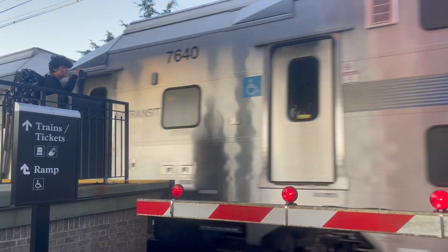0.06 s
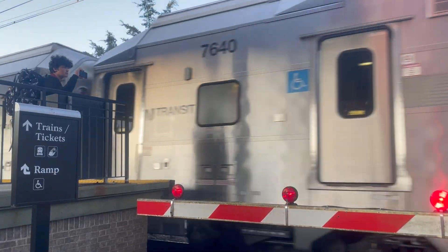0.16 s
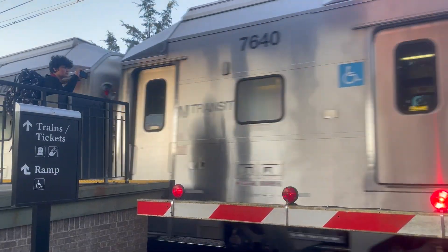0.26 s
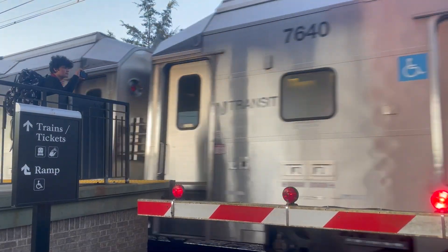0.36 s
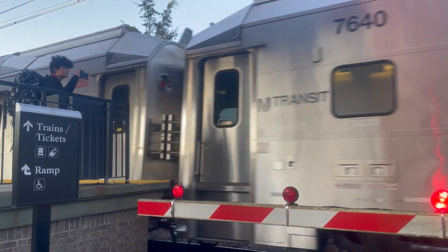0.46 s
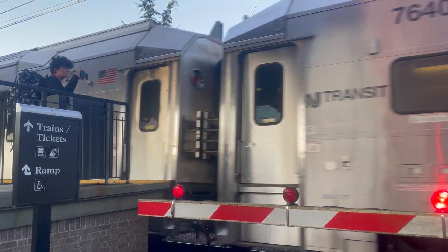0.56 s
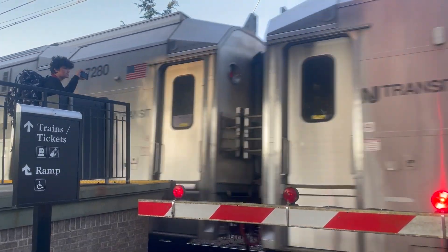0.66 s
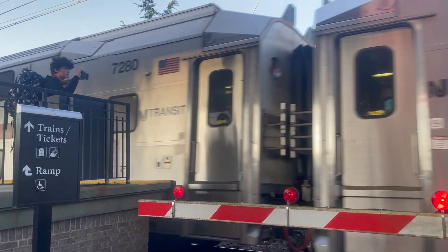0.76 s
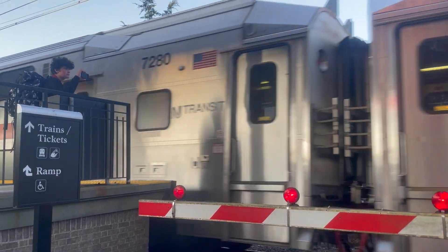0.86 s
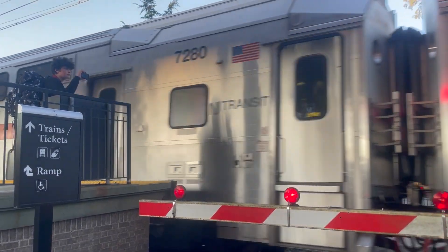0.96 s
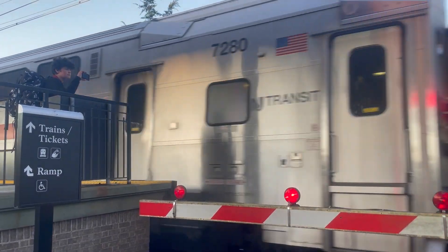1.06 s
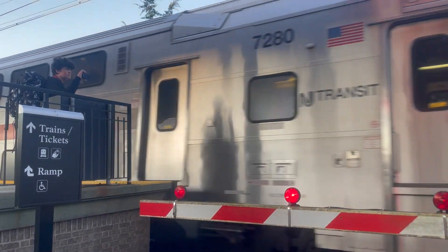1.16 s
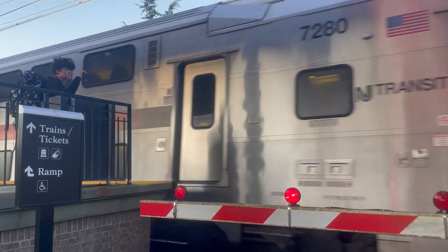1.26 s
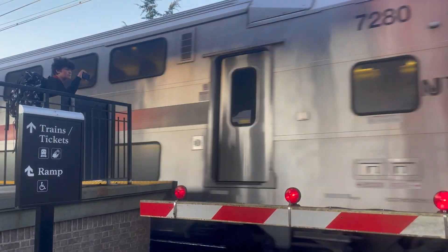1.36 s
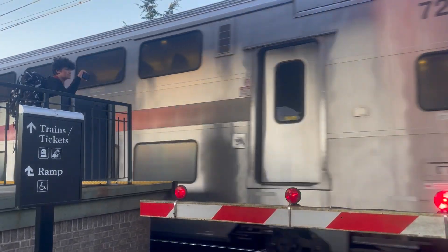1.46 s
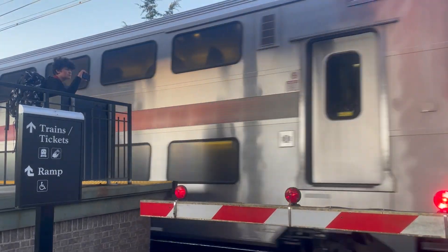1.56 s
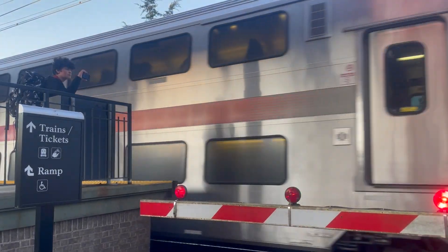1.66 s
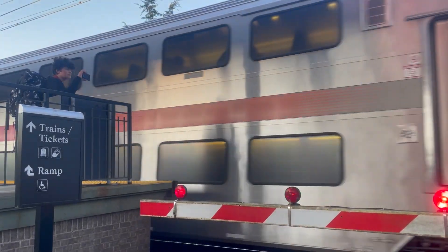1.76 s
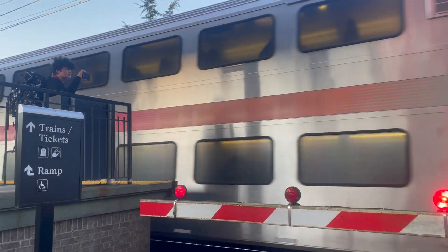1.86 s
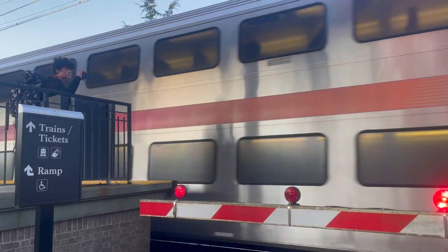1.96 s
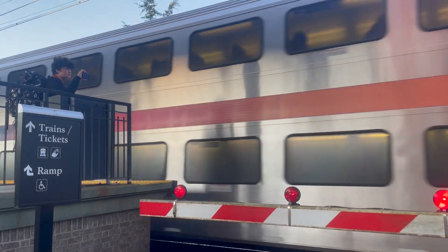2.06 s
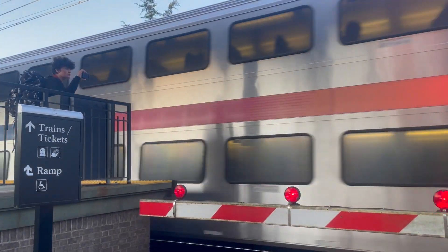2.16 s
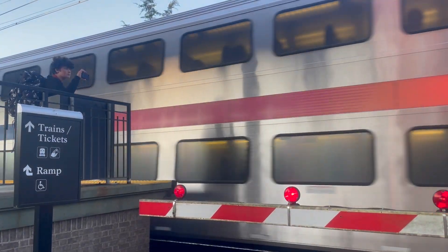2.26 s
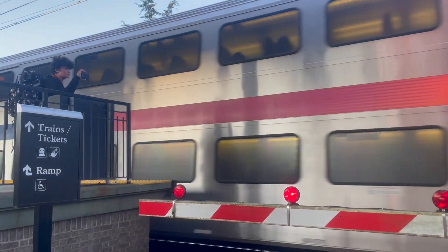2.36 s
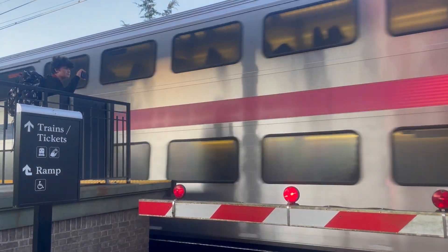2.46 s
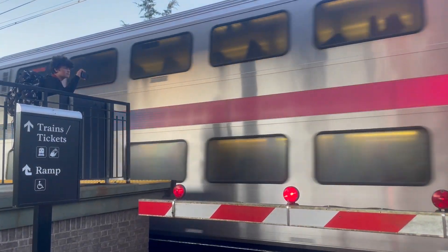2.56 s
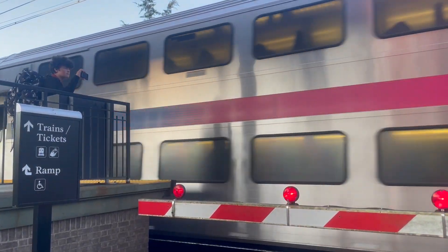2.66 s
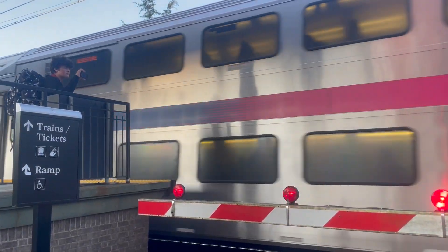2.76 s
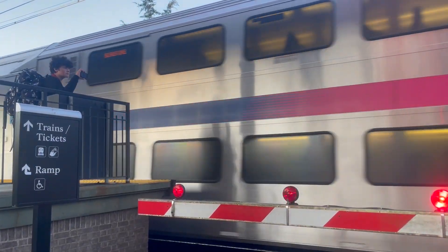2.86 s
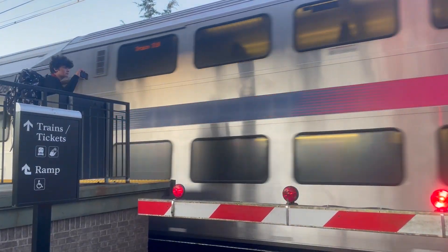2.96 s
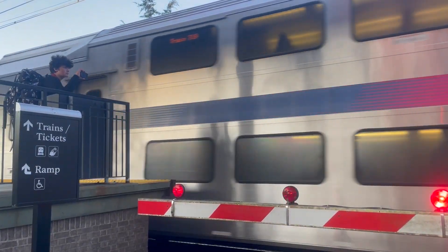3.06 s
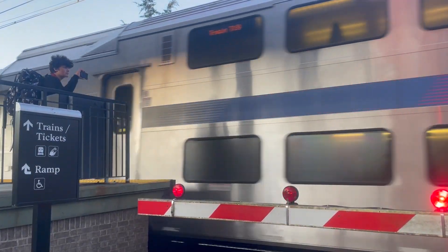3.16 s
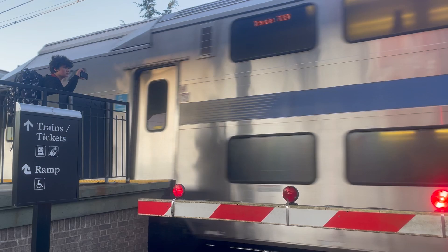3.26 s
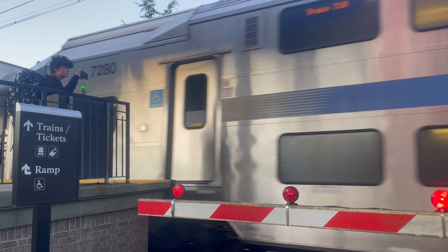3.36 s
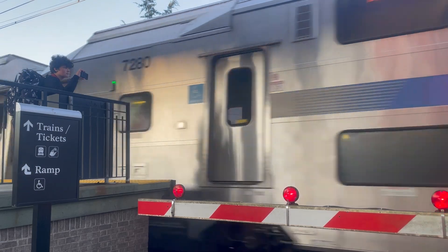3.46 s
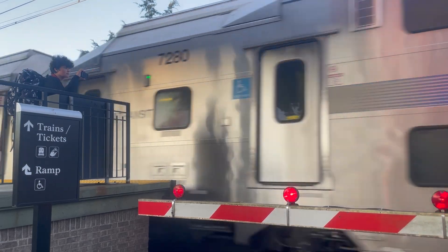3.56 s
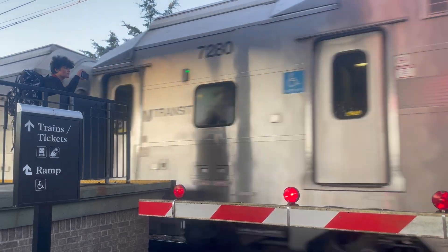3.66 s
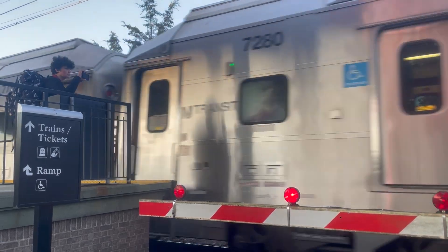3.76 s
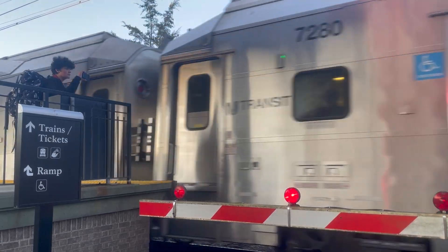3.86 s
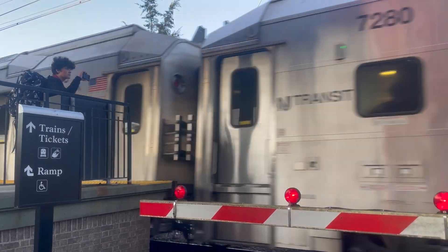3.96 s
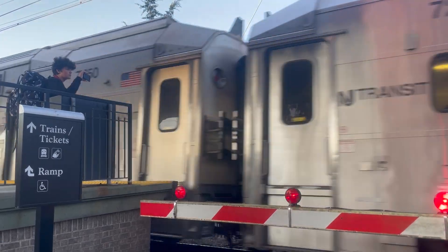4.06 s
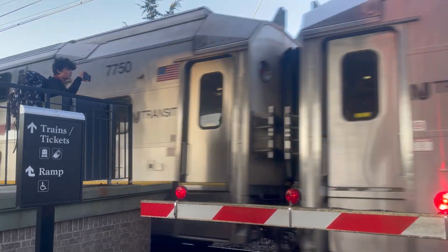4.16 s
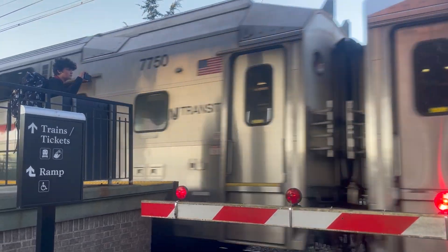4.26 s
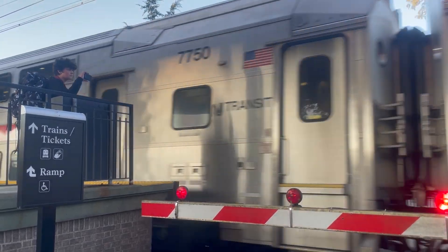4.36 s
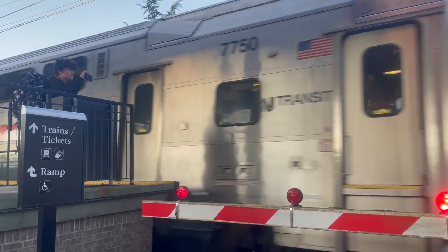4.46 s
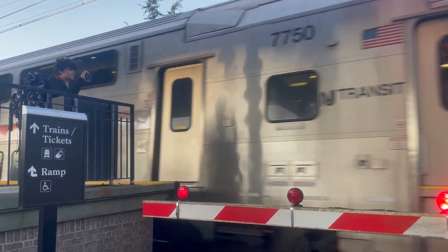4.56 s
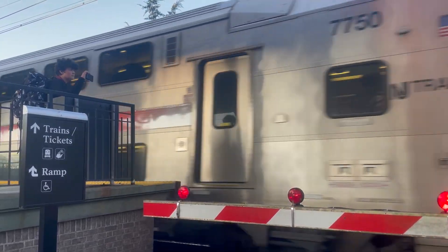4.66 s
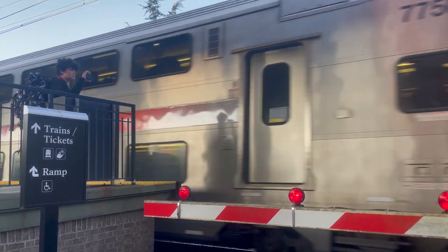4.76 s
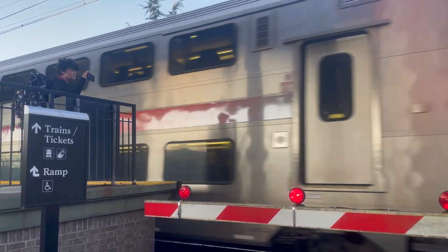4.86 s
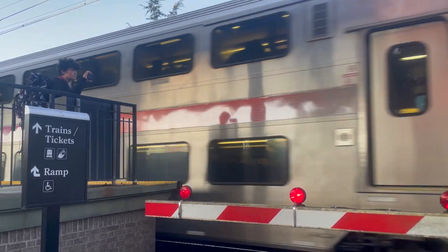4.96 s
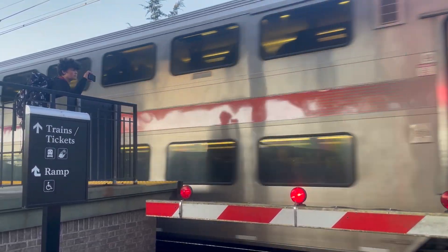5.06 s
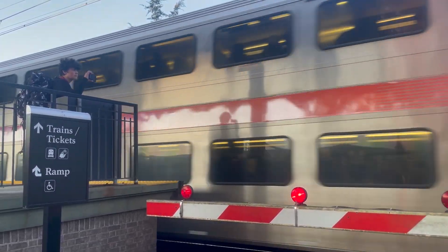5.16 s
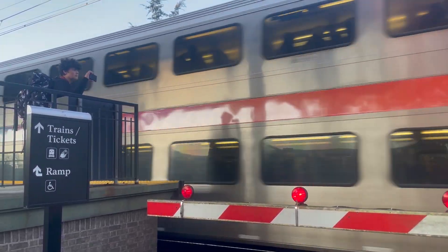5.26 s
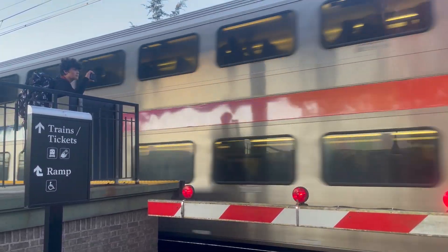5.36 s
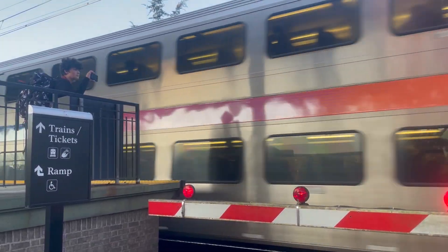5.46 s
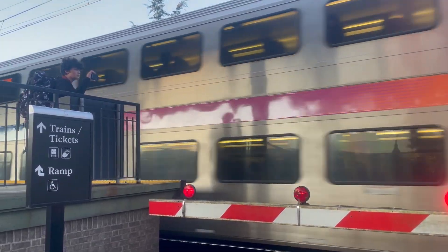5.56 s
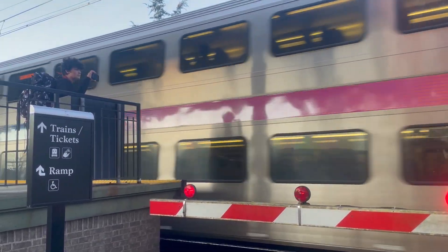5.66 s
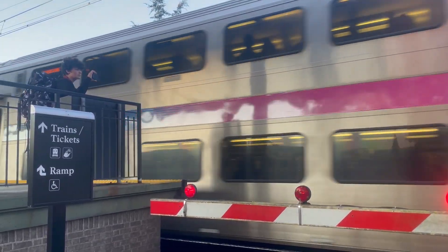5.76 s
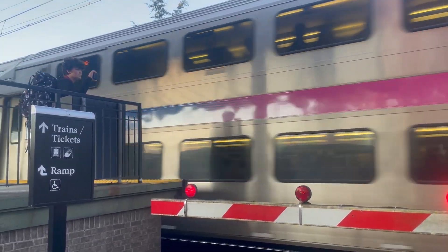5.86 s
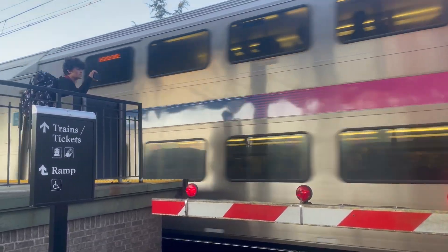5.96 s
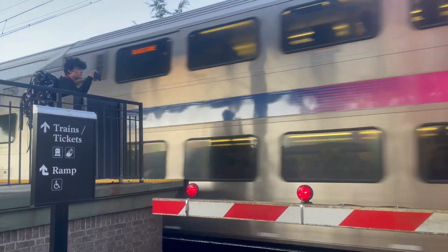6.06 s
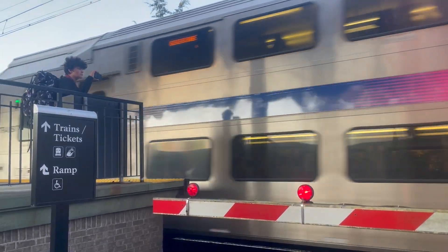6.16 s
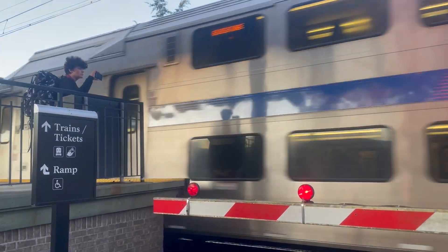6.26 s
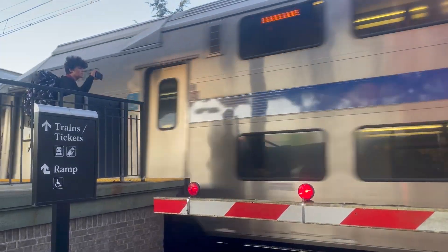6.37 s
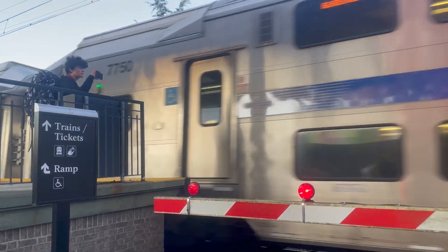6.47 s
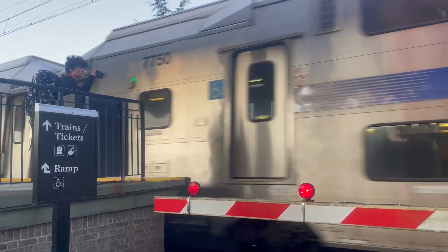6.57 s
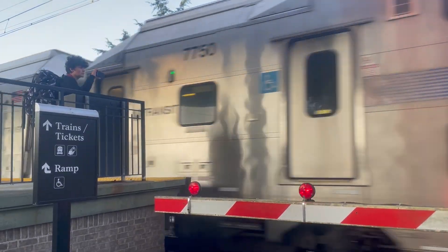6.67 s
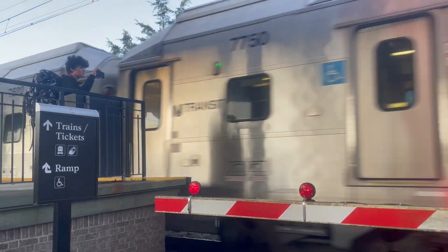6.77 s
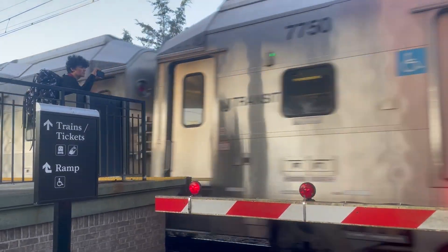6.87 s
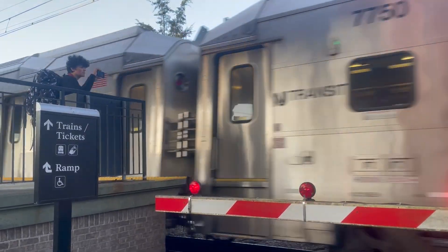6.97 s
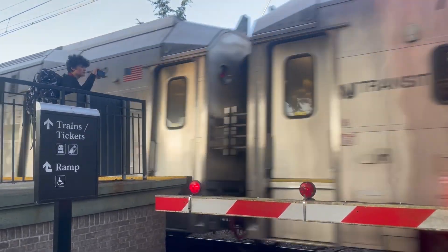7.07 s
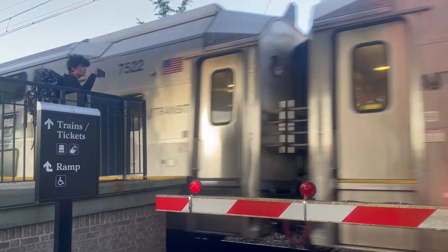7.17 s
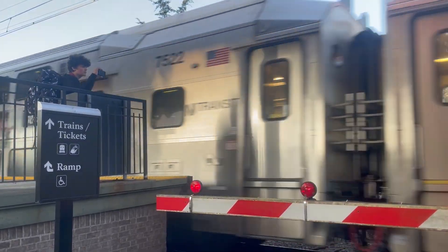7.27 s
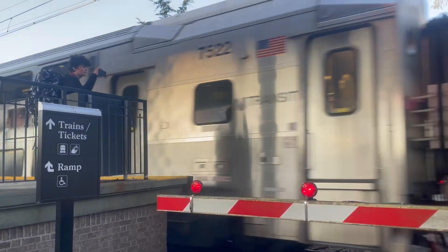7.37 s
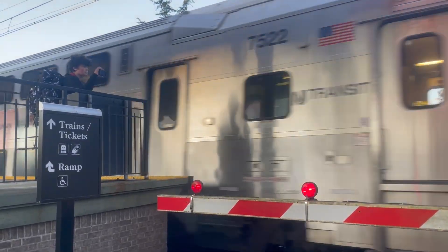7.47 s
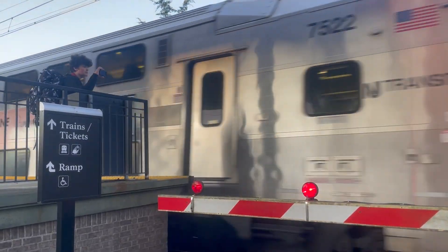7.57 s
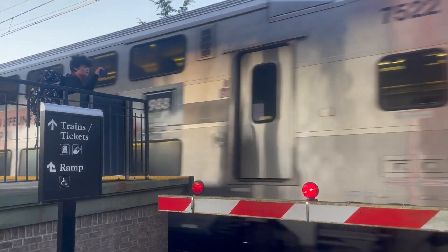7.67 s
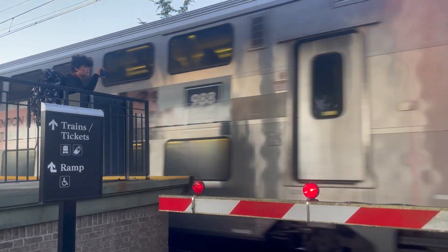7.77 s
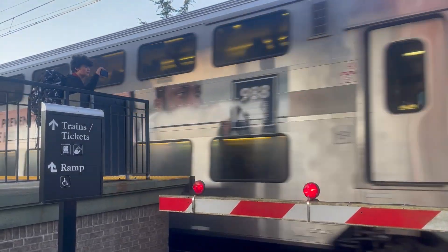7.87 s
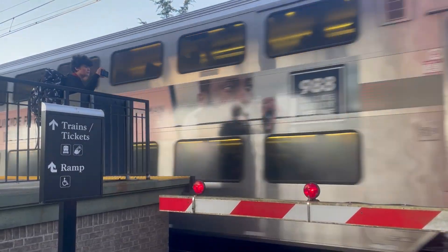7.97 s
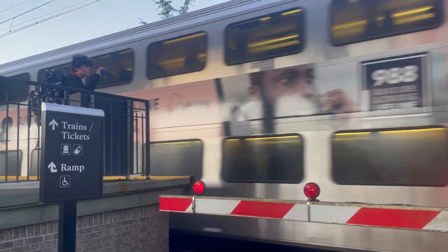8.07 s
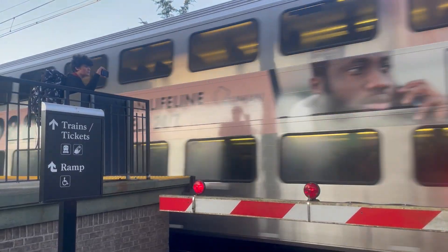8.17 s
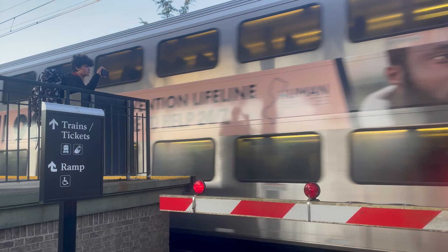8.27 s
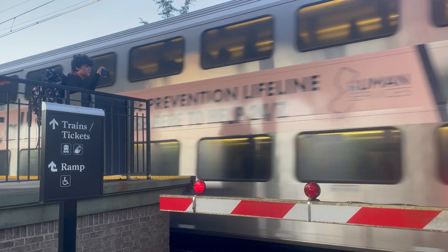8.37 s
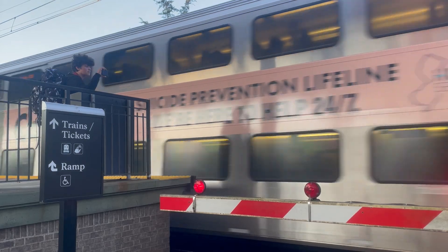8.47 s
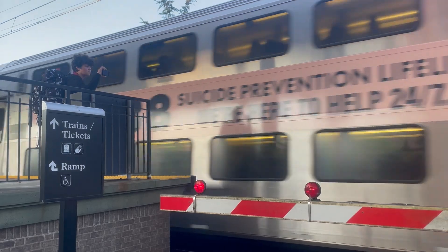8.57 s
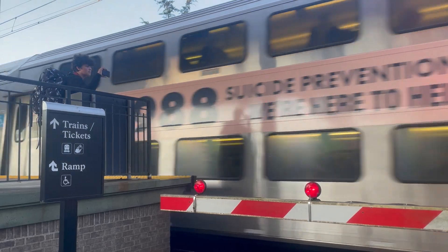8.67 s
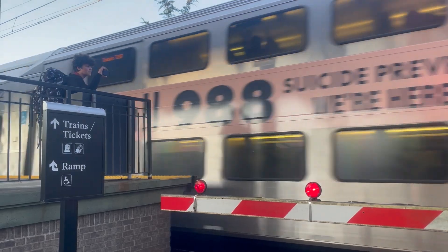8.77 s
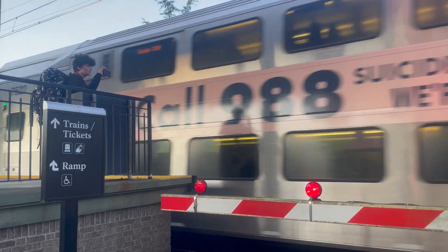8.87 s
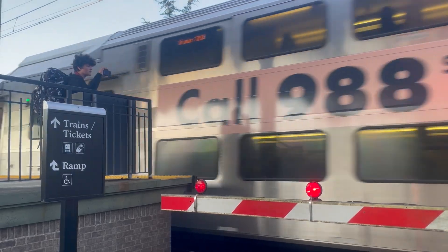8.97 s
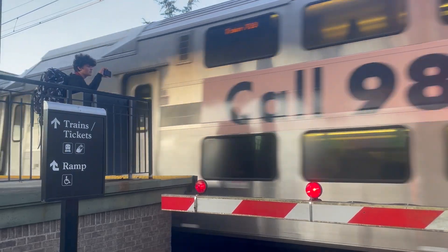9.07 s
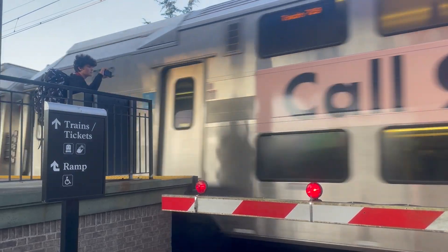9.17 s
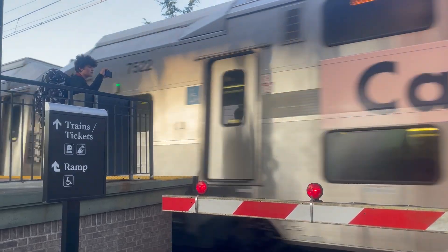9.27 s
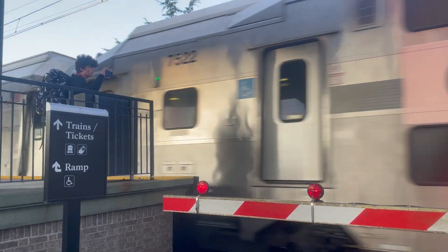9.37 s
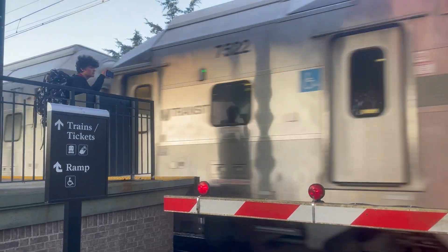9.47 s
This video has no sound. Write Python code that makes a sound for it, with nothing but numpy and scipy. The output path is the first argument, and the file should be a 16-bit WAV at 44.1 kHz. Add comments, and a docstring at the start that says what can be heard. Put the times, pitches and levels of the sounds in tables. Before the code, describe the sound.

A train rolls steadily past a few metres from a small stereo microphone outdoors at a station. Low rumble and roar swell whenever the wheels at a coupling pass, with four heavy clunks over a rail joint and loose steel rattling. Between couplings it sinks to a softer rolling hum. Brief piercing flange squeals and hiss come early and near the middle; later wheels sing waveringly, and the knocks grow heavier.

```python
"""Double-deck commuter train at a platform

A double-deck train rolls through a station, a few metres from a small stereo microphone with two ports.
Each coach end brings two bogies: filtered noise roars and sings louder as they pass. Ringing modes make
the wheels knock over a rail joint, with rattling grit; an unsteady low sine drums under the coaches.
Flanges scrape in swelling hiss and break into short gliding squeals; wavering sines are singing wheels."""
import sys
import numpy as np
from scipy import signal
from scipy.fft import rfft, irfft, next_fast_len
from scipy.io import wavfile
from scipy.ndimage import uniform_filter1d

SR = 44100
rng = np.random.default_rng(int(sys.argv[2]) if len(sys.argv) > 2 else 0)


def wav_out(sig):
    """Save sig, one row per channel (or a flat mono array), as 16-bit PCM at SR to the path in sys.argv[1]."""
    wavfile.write(sys.argv[1], SR, np.round(np.clip(np.atleast_2d(sig).T, -1, 1) * 32767).astype(np.int16))


N = 419391
T = np.arange(N) / SR


def amp(db):
    """Decibels to gain."""
    return 10 ** (np.asarray(db) / 20)


def evened(x):
    """Scales to rms 1."""
    return x / np.sqrt(np.mean(x ** 2) + 1e-20)


def read(points, hz):
    """Reads a table on a log-frequency axis."""
    f, value = np.transpose(points)
    return np.interp(np.log(hz + 1), np.log(f + 1), value)


def add(mix, s, sound):
    """Mixes a sound in at time s."""
    part = mix[..., max(round(s * SR), 0):][..., :sound.shape[-1]]
    part += sound[..., :part.shape[-1]]


def wander(size, rate):
    """Random line of rms 1 with rate random points a second, joined by straight lines."""
    knots = rng.standard_normal(4096)
    return evened(np.interp(np.arange(size) / SR * rate, np.arange(4096), knots, period=4096))


def noise(colour, patchy_db, size=1024):
    """Two unrelated noises with a colour (dB as a function of Hz) and drifting patches."""
    hz = np.fft.rfftfreq(size, 1 / SR)
    shape = (N // (size // 4) + 5, len(hz))
    over_time = uniform_filter1d(rng.standard_normal(shape), size=10, axis=0)
    patches = evened(uniform_filter1d(over_time, size=5, axis=1))
    z = rng.standard_normal((2, *shape)) + 1j * rng.standard_normal((2, *shape))
    z = z * amp(colour(hz) + patchy_db * patches)
    sound = signal.istft(z.swapaxes(1, 2), nperseg=size, noverlap=size - size // 4)[1]
    return evened(sound[:, :N])


def high_pass(x, hz):
    """Takes away the bass below hz."""
    return signal.sosfilt(signal.butter(2, hz, "highpass", fs=SR, output="sos"), x)


def ring(force, modes):
    """The answer of damped modes to a force."""
    t = np.arange(len(force)) / SR
    answer = sum(amp(db - 60 * t / t60) * np.sin(2 * np.pi * hz * t) for hz, db, t60 in modes)
    return signal.fftconvolve(force, answer)[:len(force)]


def reflections(x, t60):
    """Two unrelated tails of echoes between the coach sides and the platform."""
    t = np.arange(SR // 2) / SR
    taps = rng.standard_normal((2, len(t))) * np.exp(-np.log(1000) * t / t60) * (t > .004)
    return signal.oaconvolve(x[None], taps / np.linalg.norm(taps[0]), axes=1)[:, :N]


SPEED_M_PER_S = 8.2
# bogies passing the microphone, two at each coupling; relative levels:
# pass_s, rumble_db (of the coach), roar_db, growl_db, singing_db (wheels and rails),
# singing_reach_m (distance from which the singing swells)
BOGIES = [(.69, -23.5, -27.5, -35.5, -43.5, 17), (1.77, -26, -27, -40.5, -45, 6.1),
          (4.13, -23.5, -23, -29, -40, 4.74), (5.08, -24.5, -25, -33.5, -39.5, 3.9),
          (7.15, -24.5, -22.5, -29, -38.5, 4.9), (7.99, -24.5, -21.5, -30, -38.5, 6.1),
          (9.9, -23, -23, -27.5, -37, 4.25)]


def passing(axis, coming_m, going_m, steepness, between_db):
    """Gain of one dB column of the bogies: each swells as it comes within reach and falls off as it goes."""
    power = amp(between_db) ** 2
    for bogie, ahead_m in zip(BOGIES, np.broadcast_to(coming_m, len(BOGIES))):
        place_m = SPEED_M_PER_S * (T - bogie[0])
        reach_m = np.where(place_m < 0, ahead_m, going_m)
        power = power + amp(bogie[axis]) ** 2 / (1 + abs(place_m / reach_m) ** steepness)
    return np.sqrt(power)


def wheel_gain():
    """The steel swells from each bogie's own reach as it comes and falls off over a fixed one behind it."""
    singing_reach_m = [bogie[-1] for bogie in BOGIES]
    return passing(axis=4, coming_m=singing_reach_m, going_m=3.72, steepness=3.38, between_db=-49.0)


def shaded(singing):
    """Between bogies the coach skirts hide the wheels, so the treble sinks further than the middle."""
    gain = wheel_gain()
    treble = signal.sosfiltfilt(signal.butter(3, 2300, "highpass", fs=SR, output="sos"), singing)
    open_share = gain / np.hypot(gain, amp(-43))
    return gain * (singing - treble * (1 - open_share))


# narrow resonances of the rolling wheels: pitch_hz, width_hz, relative level_db
WHEEL_MODES = [(1130, 70, -6), (1930, 160, 0), (2070, 50, -3), (2700, 110, -2), (2880, 80, -4),
               (3800, 110, -10)]


def wheel_colour(hz):
    """Spectrum in dB of the wheel resonances, their powers summed."""
    power = 0
    for pitch_hz, width_hz, db in WHEEL_MODES:
        power = power + amp(db) ** 2 / (1 + (2 * (hz - pitch_hz) / width_hz) ** 2) ** 2
    return 10 * np.log10(power)


# spectrum of the coach's deep rumble: pitch_hz, relative level_db
RUMBLE = [(36, -26), (50, 6), (64, 13.5), (85, 10.5), (110, 4.5), (170, 3), (300, -77)]
# spectrum of the rolling roar: pitch_hz, relative level_db
ROAR = [(60, -24.5), (125, -1), (180, -0.5), (250, -1.5), (320, -12), (430, -25), (750, -80)]
# spectrum of the growl above the roar: pitch_hz, relative level_db
GROWL = [(170, -33), (270, 0.5), (340, -1.5), (430, -1), (550, -10.5), (750, -18.5), (1200, -56)]
# broad spectrum of singing wheel and rail steel: pitch_hz, relative level_db
SINGING = [(200, -30), (440, 2.5), (800, -2), (1120, -4), (1450, -7.5), (1980, -5), (2350, -9.5),
           (2750, -9), (3250, -14), (4900, -16), (5800, -17), (11000, -26.5), (13500, -42)]


def rolling():
    """Rough treads shake the coaches, the bogies and the steel of wheels and rails."""
    rumble_gain = passing(axis=1, coming_m=4.9, going_m=2.54, steepness=2.33, between_db=-38.5)
    rumble = rumble_gain * noise(lambda hz: read(RUMBLE, hz), patchy_db=1.0, size=4096)
    roar_gain = passing(axis=2, coming_m=4.47, going_m=4.65, steepness=7.6, between_db=-33.0)
    roar = roar_gain * noise(lambda hz: read(ROAR, hz), patchy_db=3.5, size=2048)
    growl_gain = passing(axis=3, coming_m=4.9, going_m=4.15, steepness=3.77, between_db=-39.0)
    growl = growl_gain * noise(lambda hz: read(GROWL, hz), patchy_db=3.0, size=2048)
    lurch = amp(1.3 * wander(N, rate=17))
    steel = amp(5.5) * noise(lambda hz: read(SINGING, hz), patchy_db=3.0)
    wheels = noise(wheel_colour, patchy_db=2.5, size=2048)
    judder = amp(0.73 * wander(N, rate=95))
    singing = steel + amp(-3.5) * wheels
    return lurch * (rumble + roar + growl) + judder * shaded(singing)


TREAD_HISS_DB = -17  # hiss of a free-running wheel, against the gain of its singing
# spectrum of the flange hiss: pitch_hz, relative level_db
HISS = [(2000, -30), (3300, -16), (5600, -7), (7000, -1), (8300, 0), (10300, -5), (11700, -12),
        (13000, -24), (15000, -28), (17000, -46)]
# spectrum of the bright fizz: pitch_hz, relative level_db
FIZZ = [(5500, -14), (9600, 0), (12000, -12), (14800, -5)]
# a flange rubs on the rail: loudest_s, hiss_db (relative), swell_s, fade_s, fizz_db (relative)
SCRAPES = [(.92, -39, 0.074, 0.22, -64), (1.35, -31, 0.18, 0.3, -39), (1.7, -36, 0.081, 0.093, -52),
           (3.45, -49.5, 0.21, 0.35, -70), (4.665, -32.5, 0.064, 0.12, -33.5),
           (4.898, -41.5, 0.16, 0.26, -41), (5.025, -38, 0.021, 0.071, -39), (7.68, -39.5, 0.37, 0.29, -53)]


def scrape():
    """Flanges rub the rail head in an uneven swelling hiss and bright fizz; treads add a faint hiss."""
    hiss_power, fizz_power = (amp(TREAD_HISS_DB) * wheel_gain()) ** 2, 0
    for s, hiss_db, swell_s, fade_s, fizz_db in SCRAPES:
        pressure = np.exp(-((T - s) / np.where(T < s, swell_s, fade_s)) ** 2)
        hiss_power = hiss_power + (amp(hiss_db) * pressure) ** 2
        fizz_power = fizz_power + (amp(fizz_db) * pressure) ** 2
    hiss = noise(lambda hz: read(HISS, hz), patchy_db=1.6, size=512)
    fizz = noise(lambda hz: read(FIZZ, hz), patchy_db=2, size=512)
    rubbing = amp(5.5) * np.sqrt(hiss_power) * hiss + np.sqrt(fizz_power) * fizz
    sizzle = amp(1.2 * wander(N, rate=420))
    flutter = amp(0.36 * wander(N, rate=53))
    return flutter * sizzle * rubbing


MOAN_WAVER = .018  # share of the pitch by which a singing wheel wavers, rms
# a wheel sings on one mode: start_s, length_s, pitch_hz, level_db (before the echoes)
MOANS = [(0, .5, 1130, -39), (3.86, .26, 2680, -36), (6.15, .7, 1850, -38.5), (6.3, .45, 1990, -36.5),
         (6.4, .75, 1130, -38), (6.65, .55, 2790, -38), (7.5, .55, 2078, -30.5), (7.6, .5, 1045, -38),
         (7.9, .42, 2690, -37), (8.87, .32, 5050, -48.5)]


def moans():
    """A wheel rings up on one of its modes, wavers and dies away."""
    dry = np.zeros(N)
    for s, length_s, hz, db in MOANS:
        swell = signal.windows.hann(round(length_s * SR))
        pitch = hz * (1 + MOAN_WAVER * wander(len(swell), rate=250))
        add(dry, s, amp(db) * swell * np.sin(2 * np.pi * np.cumsum(pitch) / SR))
    return dry


# hollow booms from under the coaches: loudest_s, relative level_db, length_s
BOOMS = [(0.286, -16, 0.05), (1.817, -20, 0.035), (2.349, -14, 0.015), (4.622, -16, 0.17),
         (5.545, -15, 0.21), (7.58, -12.5, 0.14), (8.053, -16, 0.03), (8.404, -15.5, 0.16)]


def booms():
    """The underside of a coach drums briefly on one low, unsteady resonance."""
    swell = sum(amp(db) * np.exp(-(2 * (T - s) / length_s) ** 2) for s, db, length_s in BOOMS)
    drum_hz = 178
    pitch = drum_hz * (1 + .17 * wander(N, rate=150))
    drum = np.sin(2 * np.pi * np.cumsum(pitch) / SR) * amp(2 * wander(N, rate=45))
    return np.array([swell * drum, np.zeros(N)])


UPPER_MODE_HZ = 245.1
# deep modes of track and bogie: pitch_hz, relative level_db
DEEP_MODES = [(160, -7), (190, -1)]


def thud(t, upper_db, length_s):
    """Track and bogie heave on a few unsteady low modes for as long as the wheel bounces."""
    heave = 0
    for hz, db in DEEP_MODES + [(UPPER_MODE_HZ, upper_db)]:
        pitch = hz * (1 + 0.076 * wander(len(t), rate=104.5))
        heave = heave + amp(db) * np.sin(2 * np.pi * np.cumsum(pitch) / SR)
    body = -heave * (1 - np.exp(-t / 0.0025)) * np.exp(-(t / length_s) ** 2.04)
    return body / np.std(body[:SR // 20])


# modes of the chatter after a blow: pitch_hz, relative level_db, t60_s (time to fall 60 dB)
CHATTER_MODES = [(274, -10, 0.042), (318, -3.5, 0.047), (367, 0.5, 0.037), (447, -1, 0.017)]
# modes of the steel clack: pitch_hz, relative level_db, t60_s
CLACK_MODES = [(565, 12, 0.048), (740, 20, 0.022), (872, 2.5, 0.059), (1830, 11.5, 0.023)]
# spectrum of the rattling steel: pitch_hz, relative level_db
GRIT = [(500, -47), (1000, 3.5), (2800, 1.5), (4500, -1.5), (5800, -2), (7500, 0.5), (11000, -19.5),
        (16000, -44)]
# loose steel clattering on the bogies: start_s, relative level_db
RATTLES = [(.56, -38.5), (1.99, -45), (2.27, -44.5), (4.345, -37.5), (8.17, -40)]
# wheels on rail joints, four loud ones to a coupling and faint ones between; relative levels:
# start_s, thump_db, upper_db (upper mode of the thump, beside the deep ones), chatter_db, clack_db,
# bounce_s (time for which the wheel bounces)
KNOCKS = [(.499, -15, -0.5, -20, -24.5, 0.052), (.873, -14.5, 3.5, -30, -33, 0.052),
          (1.596, -15, 0.5, -25, -31, 0.059), (1.951, -15, -3.5, -24.5, -27, 0.058),
          (2.979, -36, 1, -36, -36, 0.023), (3.971, -12, 9, -18.5, -19, 0.039),
          (4.291, -12, -0.5, -19, -22.5, 0.053), (4.93, -13, 2.5, -20, -35, 0.046),
          (5.227, -12.5, -4.5, -17.5, -20, 0.061), (6.183, -28, 0, -36, -34, 0.017),
          (7.017, -11.5, 4, -22, -26, 0.056), (7.292, -10.5, 5, -15.5, -18, 0.061),
          (7.859, -10.5, 3.5, -20, -31, 0.036), (8.129, -10, 3.5, -21, -19, 0.062)]


def knocks():
    """A wheel drops into the joint, clacks, thuds and chatters; loose steel rattles on a moment longer."""
    t = np.arange(SR // 3) / SR
    thumps, clacks, rattle = np.zeros((3, N))
    swell_s = 0.028
    shake = (t / swell_s) * np.exp(1 - t / swell_s)
    for s, thump_db, upper_db, chatter_db, clack_db, bounce_s in KNOCKS:
        blow = 1. * (t == 0)
        hits = rng.standard_normal(len(t)) * (rng.random(len(t)) < 900 / SR)  # about 900 a second
        rebounds = hits * np.exp(-(t / bounce_s) ** 3)
        rebounds = rebounds / (np.linalg.norm(rebounds) + 1e-9)
        rise_s = 0.0033 * amp(0.6 * (thump_db - clack_db))  # a dull blow builds up more slowly
        chatter = high_pass(ring(blow + 2.0 * rebounds, CHATTER_MODES), hz=228)
        chatter = chatter * (1 - np.exp(-t / rise_s))
        chatter = chatter / np.std(chatter[:SR // 20])
        clack = high_pass(ring(blow + 0.25 * rebounds, CLACK_MODES), hz=278)
        thump = amp(thump_db) * thud(t, upper_db, bounce_s)
        add(thumps, s, thump + amp(chatter_db) * chatter)
        add(clacks, s, amp(clack_db) * clack / np.std(clack[:SR // 50]))
        add(rattle, s, amp(thump_db - 20.5) * shake)
    for s, db in RATTLES:
        add(rattle, s, amp(db) * shake)
    direct = thumps + clacks
    rebound = np.roll(thumps, SR // 300)  # the ground throws the thump back a moment later
    flicker = amp(1.3 * wander(N, rate=660))
    grit = rattle * flicker * noise(lambda hz: read(GRIT, hz), patchy_db=3.0, size=512)
    echoes = amp(-8.5) * reflections(direct, t60=0.19)
    return np.array([direct, amp(-1.0) * rebound]) + echoes + grit


ENDS_DB = -11.5  # start and end of a squeal, against its peak
# flange squeals: start_s, length_s, first_hz, last_hz, relative level_db, peak_at (0-1 of the length),
# slide_at (0-1), slide_share (span of the slide, 0-1), jitter (share of the pitch, at the peak),
# second_db (overtone against the first tone)
SQUEALS = [(.888, 0.095, 3935, 3915, -31.5, 0.48, 0.42, 0.1, .013, -20),
           (1.322, 0.24, 5400, 4070, -21, 0.3, .41, 0.3, 0.012, -6),
           (1.632, 0.1, 4100, 5190, -26, 0.36, 0.25, 0.11, .019, -20),
           (3.36, 0.19, 5210, 5110, -37.5, 0.44, 0.75, 0.2, 0.009, -4),
           (4.66, 0.09, 5230, 4350, -22.5, 0.17, 0.42, .13, 0.017, 2.5),
           (4.98, .095, 4350, 5080, -22.5, 0.36, 0.19, .13, 0.019, -1.5),
           (7.38, 0.115, 4580, 4790, -36, 0.5, 0.3, .2, .016, -14)]


def squeals(third_db):
    """Steel sticks and slips: an unsteady tone with two overtones swells, slides to a new pitch and fades."""
    dry = np.zeros(N)
    for s, length_s, first_hz, last_hz, db, peak_at, slide_at, slide_share, jitter, second_db in SQUEALS:
        along = np.linspace(0, 1, round(length_s * SR))
        slide = (1 + np.tanh((along - slide_at) / slide_share)) / 2
        swell_db = ENDS_DB * np.interp(along, [0, np.clip(peak_at, 0, 1), 1], [1, 0, 1]) ** 2
        unrest = jitter * amp(swell_db / 2)  # the louder, the rougher
        glide_hz = first_hz + (last_hz - first_hz) * slide
        hz = glide_hz * (1 + unrest * wander(len(along), rate=800))
        angle = 2 * np.pi * np.cumsum(hz) / SR
        overtones = np.sin(2 * angle) + amp(third_db) * np.sin(3 * angle)  # third against second
        tone = np.sin(angle) + amp(second_db) * overtones
        gain = amp(db + swell_db + 2 * wander(len(along), rate=300))
        rasp = evened(1 + 30 * unrest * wander(len(along), rate=1000))
        add(dry, s, tone * rasp * gain * signal.windows.tukey(len(along), .15))
    return dry


def smeared(dry):
    """Tones from under the train come out with echoes from the coach sides and the platform."""
    return dry * amp([[-.6], [-6]]) + amp(-4.2) * reflections(dry, t60=.14)


# how alike the two microphone ports hear: pitch_hz, likeness (0-1)
LIKENESS = [(60, .93), (300, .8), (900, .42), (1400, .15), (2100, .2), (2900, .8), (4300, .68), (5500, .42),
            (7000, .78), (8600, .92)]
# phase by which the left port leads the right: pitch_hz, lead_rad
LEAD = [(60, .1), (1100, -.3), (2250, -3.1), (3100, -6.4), (4000, -5.5), (4900, -5.7), (5800, -3.7),
        (6900, -5.4), (8500, -3.1), (10700, 0), (14500, 6.3)]
# left port minus right port: pitch_hz, level_db
BALANCE_DB = [(300, -2), (750, -4.5), (1400, 2), (1900, 4), (2300, 1), (2700, 4.5), (3300, -1), (5000, 3),
              (6200, -4), (8000, 0)]


def scene():
    """All sources reach two ports that hear partly the same sound, shifted in phase."""
    tones = smeared(squeals(third_db=-15) + moans())
    size = next_fast_len(N + 4096)
    common, apart = rfft(rolling() + scrape() + knocks() + booms() + tones, size)
    hz = np.fft.rfftfreq(size, 1 / SR)
    likeness = np.clip(read(LIKENESS, hz), 0, 1)
    common = common * np.sqrt((1 + likeness) / 2)
    apart = apart * np.sqrt((1 - likeness) / 2)
    # half of the lead and balance goes to each port, in opposite senses
    port = amp(read(BALANCE_DB, hz) / 2) * np.exp(.5j * read(LEAD, hz))
    left, right = (common + apart) * port, (common - apart) / port
    return irfft(np.array([left, right]), size)[:, :N]


EDGE_HZ = 15900  # top of the band


def record(dry):
    """The loudest peaks are rounded off; then the band limit."""
    ceiling = .92
    rounded = dry / (1 + abs(dry / ceiling) ** 6) ** (1 / 6)
    band = signal.firwin(511, EDGE_HZ, window=("kaiser", 9), fs=SR)
    return signal.oaconvolve(rounded, band[None], "same")


dry = scene()
out = record(dry)
wav_out(out)
```